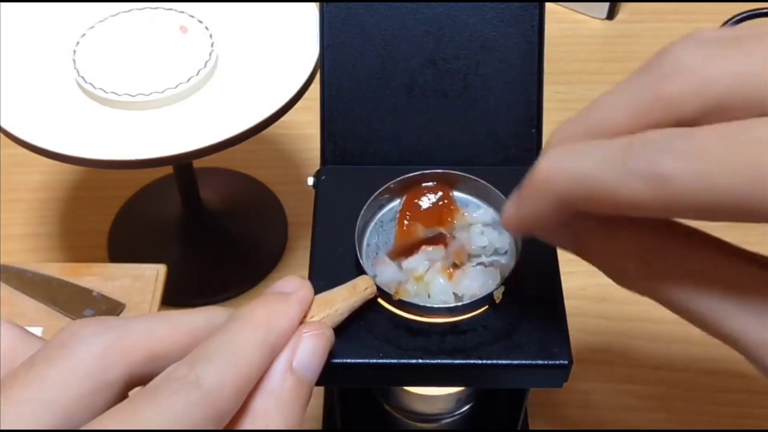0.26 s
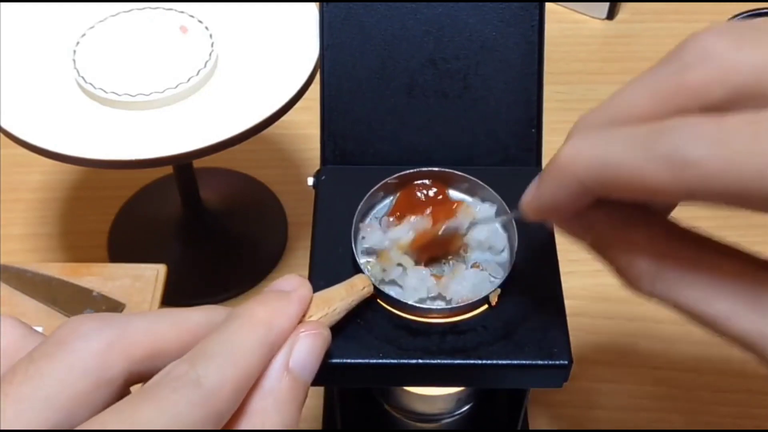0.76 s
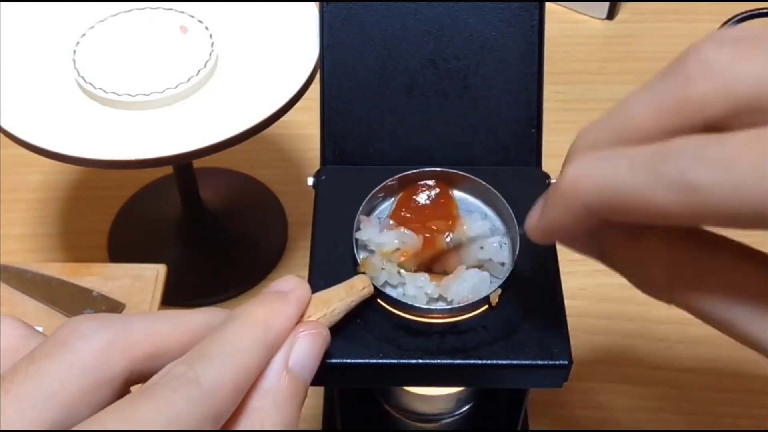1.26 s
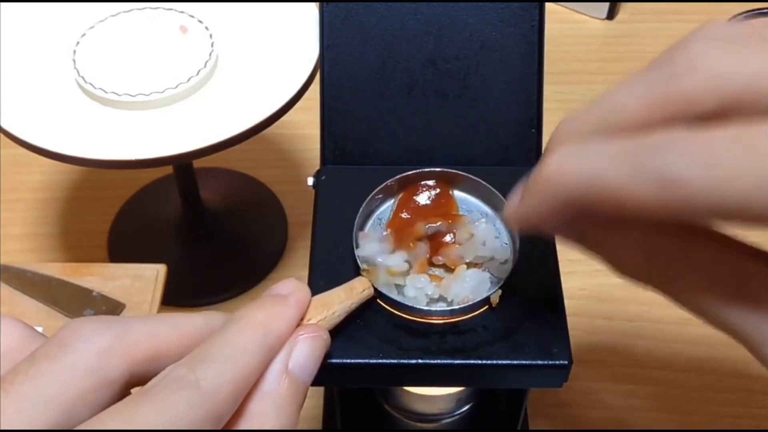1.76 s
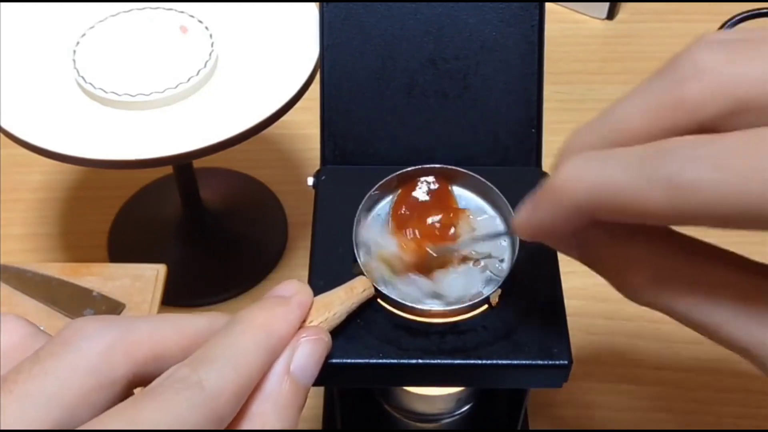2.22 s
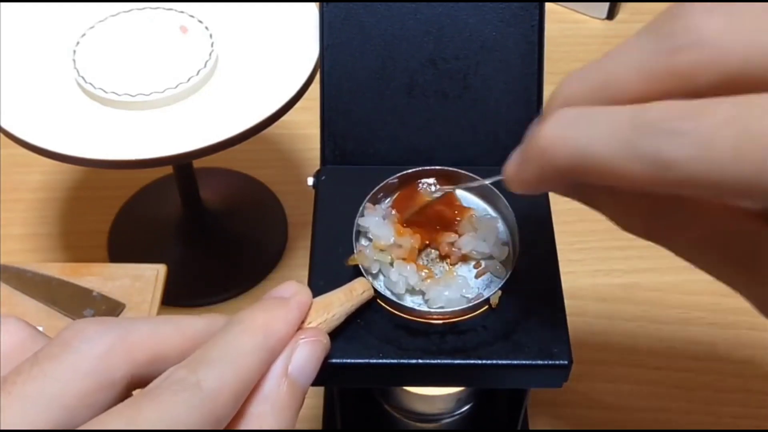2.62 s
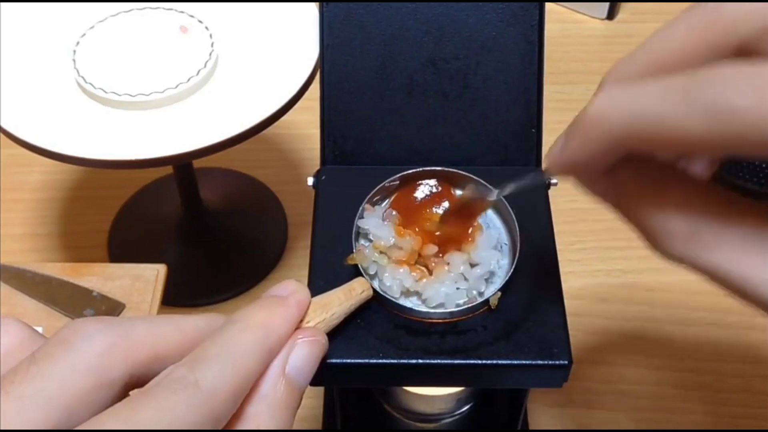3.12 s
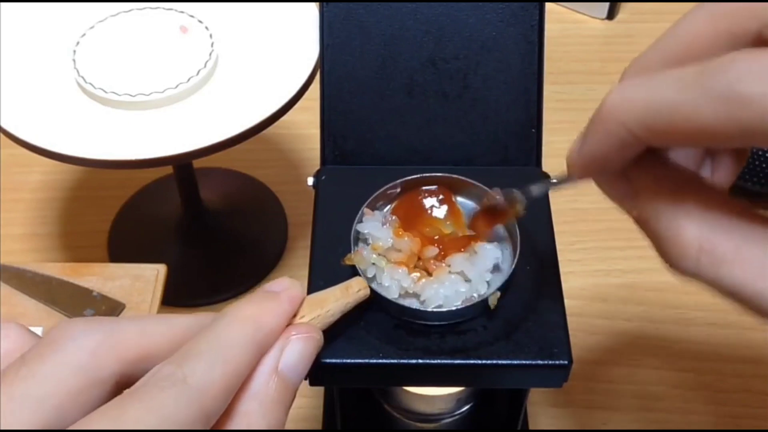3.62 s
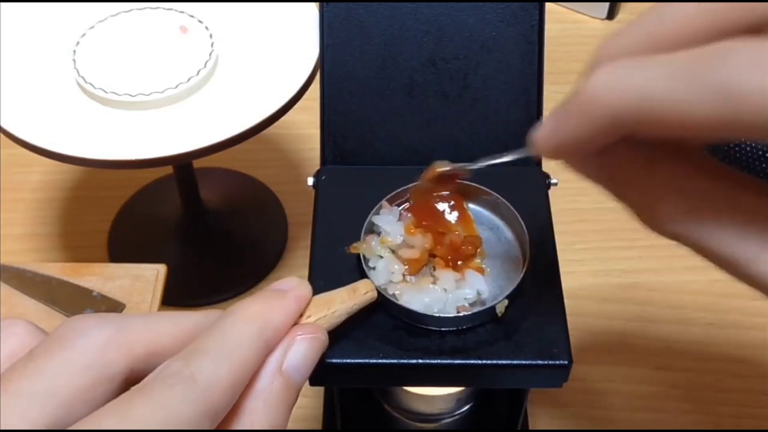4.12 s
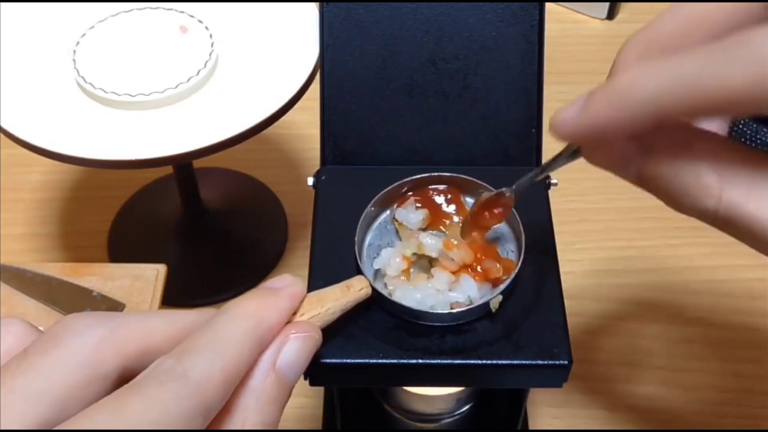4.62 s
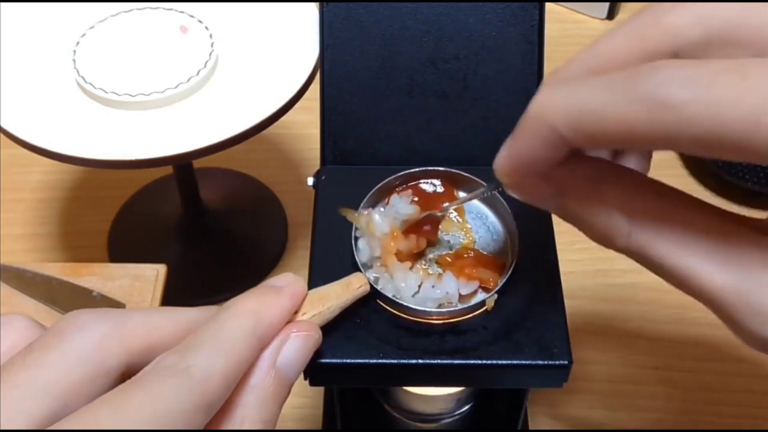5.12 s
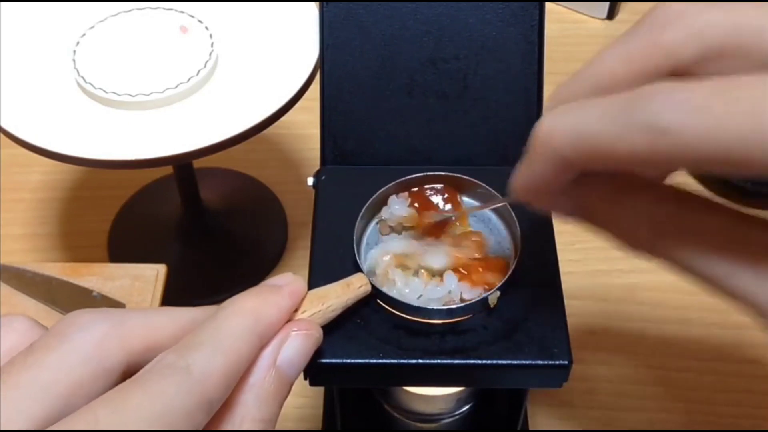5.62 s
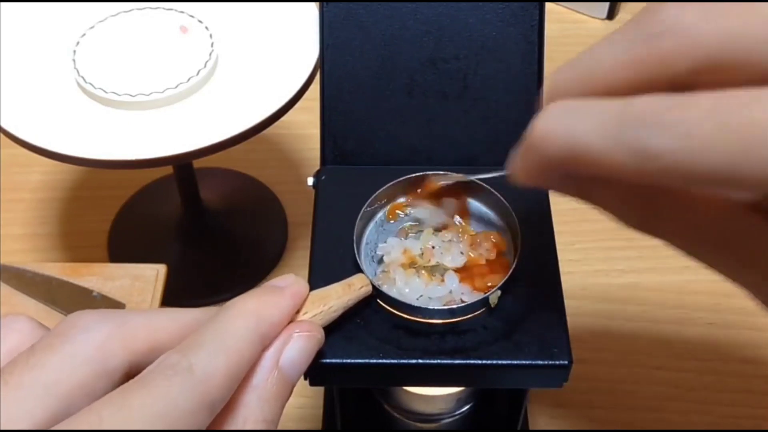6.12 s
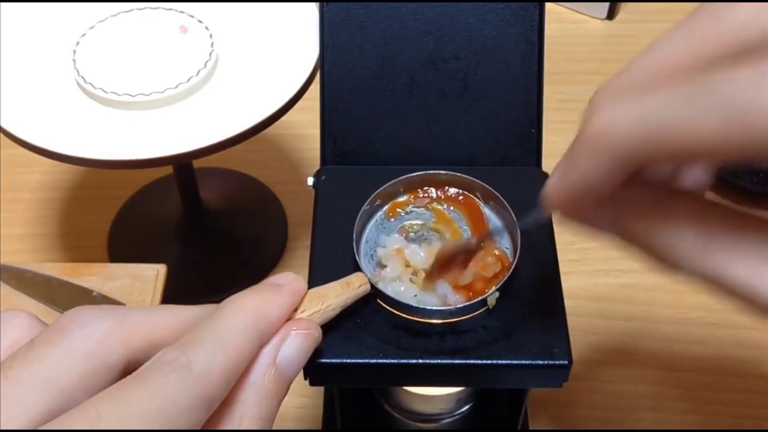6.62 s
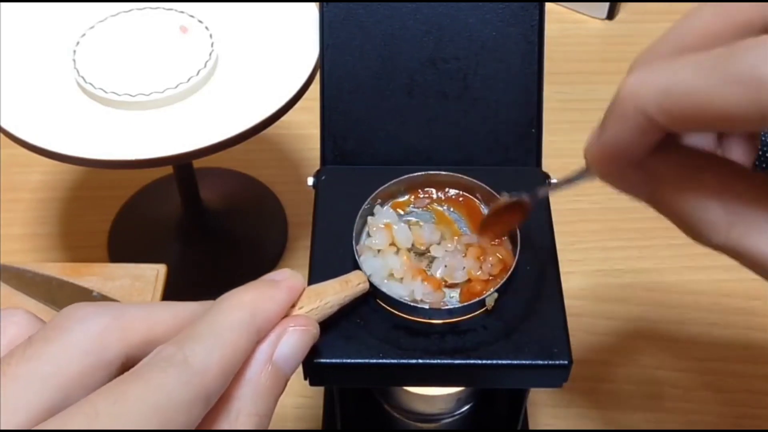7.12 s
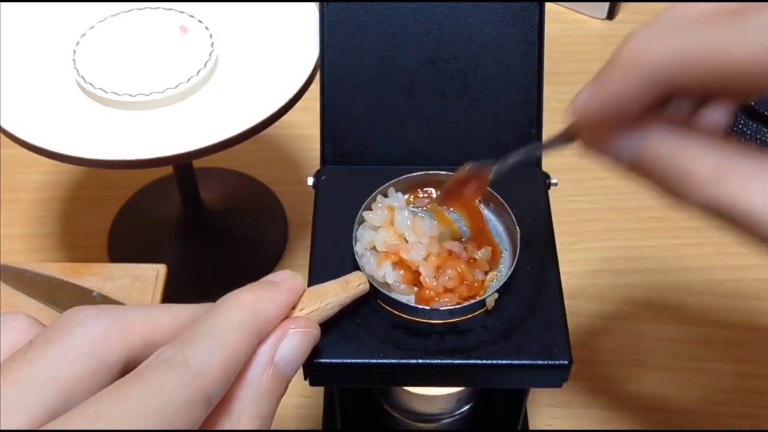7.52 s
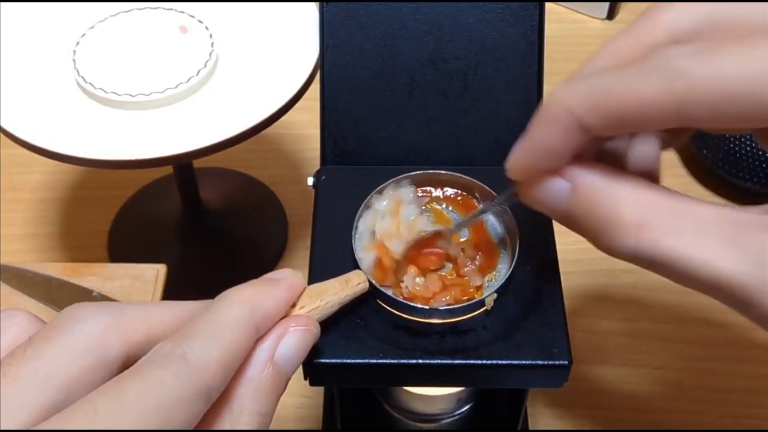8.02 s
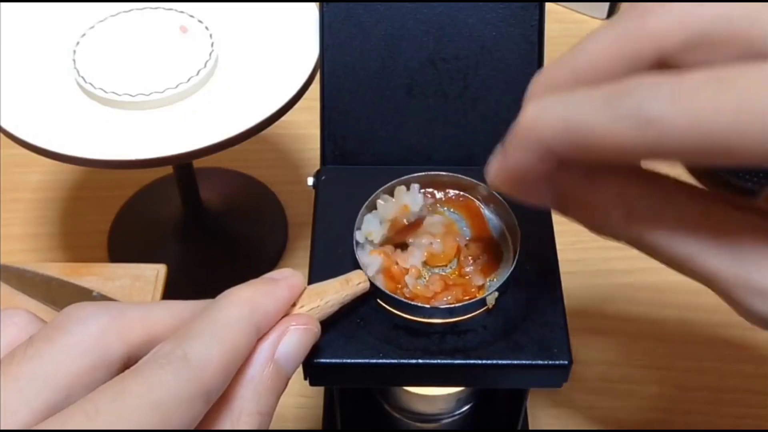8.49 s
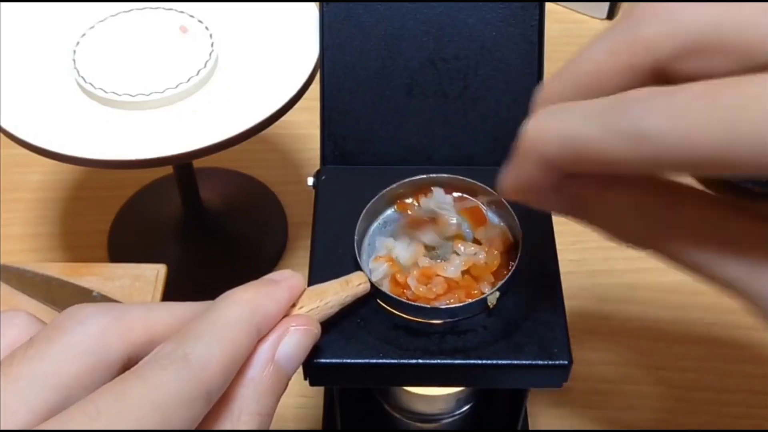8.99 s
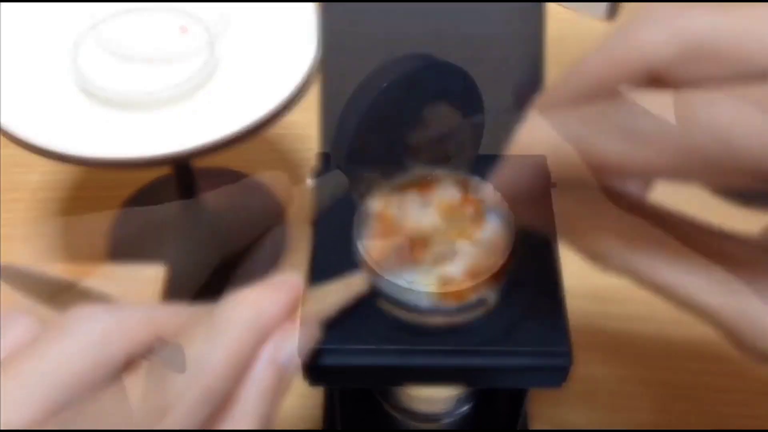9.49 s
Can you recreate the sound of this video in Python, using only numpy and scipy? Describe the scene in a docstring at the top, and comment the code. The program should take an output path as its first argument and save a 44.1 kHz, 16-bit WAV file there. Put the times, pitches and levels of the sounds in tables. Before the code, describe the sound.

Rice and thick sauce are stirred in a tiny hot metal pan, sizzling in bright short bursts with sharp snaps and light spoon clinks.

```python
"""A quiet room: rice and thick sauce are stirred with a small spoon in a tiny hot metal pan on a table-top stove.
Each stroke spreads wet food on the hot metal: clumps of short rings and hiss make a bright sizzle that dies down.
Blisters and the spoon's edge snap or tick: sharp clicks with a dying rattle; sticky food squelches in duller clicks.
The spoon now and then knocks and scrapes, setting the pan ringing. Low noise and a faint hum lie underneath."""
import sys
import numpy as np
from scipy import signal
from scipy.fft import rfft, irfft
from scipy.io import wavfile
from scipy.ndimage import uniform_filter1d

SR = 44100
rng = np.random.default_rng(int(sys.argv[2]) if len(sys.argv) > 2 else 0)


def unload_audio(sound):
    """Save the sound as a 16-bit wav file, at the path given as the first command line argument."""
    columns = np.transpose(np.atleast_2d(sound))
    # keep every value between -1 and 1, then stretch to whole-number steps
    steps = np.round(np.clip(columns, -1, 1) * 32767)
    wavfile.write(sys.argv[1], SR, steps.astype(np.int16))


N = 429975
TIME = np.arange(N) / SR   # seconds
SNAP_T60_S = 0.0065   # time in which the rattle of a sharp snap falls by 60 dB

# tone of the sharp snaps and ticks: (frequency [Hz], relative level [dB])
SNAP_SPECTRUM = [(500, -22), (2000, -22.5), (4000, -10.5), (7000, -7), (10000, 1), (13000, -0.5),
                 (16000, -3)]
# fuller tone of a snap's body, also used for the clack of the spoon: (frequency [Hz], relative level [dB])
BODY_SPECTRUM = [(150, -21.5), (500, -4), (1200, -5.5), (2000, -2), (3500, -6.5), (6000, 0), (12000, -26)]


def from_db(db):
    """Turn decibels into a gain."""
    return 10 ** (np.asarray(db) / 20)


def rms_one(x):
    """Scale to an rms (average strength) of 1."""
    return x / np.sqrt(np.mean(x ** 2) + 1e-20)


def drift(rate):
    """Wander smoothly and at random with an rms of 1, taking `rate` new values a second."""
    return rms_one(np.interp(TIME * rate, np.arange(N), rng.standard_normal(N)))


def colour(x, spectrum, size=2048):
    """Give a sound the tone of a spectrum, with a filter of unit energy that acts as early as it can."""
    hz, db = np.transpose(spectrum)
    grid = np.linspace(1, SR / 2, size // 2 + 1)
    gain = from_db(np.interp(np.log(grid), np.log(hz), db))
    # folding the cepstrum makes the filter minimum-phase: no sound before its cause
    cepstrum = irfft(np.log(gain))
    cepstrum[1:size // 2] *= 2
    cepstrum[size // 2 + 1:] = 0
    response = irfft(np.exp(rfft(cepstrum)))
    return signal.oaconvolve(x, response / np.linalg.norm(response))[:N]


def ring(clicks, hz, t60):
    """Each click sets off a sine that dies by 60 dB in t60 seconds; a click of 1 starts a sine of height 1."""
    r = from_db(-60 / (t60 * SR))
    w = 2 * np.pi * hz / SR
    return signal.lfilter([0, np.sin(w)], [1, -2 * r * np.cos(w), r * r], clicks + 1e-18)


def grains(per_s, spread_db, largest):
    """Clicks at random moments; a spread above 0 dB makes many small and few large."""
    sizes = from_db(spread_db * np.minimum(rng.exponential(1, N), largest))
    sizes = sizes * rng.choice([-1, 1], N)
    return sizes * (rng.random(N) < per_s / SR)


def even(x, seconds):
    """Hold the short-term rms near 1 and keep the finer grain."""
    power = uniform_filter1d(x ** 2, int(seconds * SR))
    return x / np.sqrt(power + np.mean(x ** 2) / 100)


def cracks(times, levels_db, t60, lead, size=2048):
    """Each event is one sharp click trailed by a short, dying rattle, with unit energy at 0 dB."""
    out = np.zeros(N + size)
    for s, db, burst in zip(times, levels_db, rng.standard_normal((len(times), size))):
        burst = burst * from_db(-60 * np.arange(size) / SR / t60)
        burst = burst / np.linalg.norm(burst)
        burst[0] = lead   # the click, against a rattle of energy 1
        at = int(s * SR)
        out[at:at + size] += from_db(db) * burst / np.linalg.norm(burst)
    return out[:N]


def hollow(x):
    """The shallow dish lifts a few bands of what sounds inside it; the lifts shift as food and spoon move about."""
    # hollow of the pan: (frequency [Hz], width [Hz], middle lift [dB])
    bands = [(3530, 320, 5.5), (5350, 270, 2.5), (6970, 370, 0), (8430, 520, 4), (10100, 440, 1),
             (12000, 370, 1.5)]
    out = x
    for hz, width_hz, lift_db in bands:
        lift = from_db(lift_db + 3.3 * drift(12))
        band = signal.lfilter(*signal.iirpeak(hz, hz / width_hz, fs=SR), x)
        out = out + (lift - 1) * band
    return out


def room(x, wet_db):
    """Add the soft, short tail of a furnished room: noise that dies by 60 dB in 0.26 s."""
    t = TIME[:SR // 2]
    tail = rng.standard_normal(len(t)) * from_db(-60 * t / 0.26)
    tail = tail * (t > 0.002)   # the tail starts 2 ms after the direct sound
    return x + from_db(wet_db) * signal.oaconvolve(x, tail / np.linalg.norm(tail))[:N]


def background():
    """Low room noise with a faint hum near 178 Hz; the noise swells a little towards the end."""
    # tone of the room noise: (frequency [Hz], relative level [dB])
    spectrum = [(20, -2.5), (60, -0.5), (100, -2), (135, 2), (180, -1), (250, -3), (500, -10),
                (1000, -14.5), (2500, -21), (8000, -23.5), (16000, -25.5)]
    hum = np.sin(2 * np.pi * np.cumsum(178 + 2 * drift(10)) / SR) * from_db(-73.0 + 2 * drift(8))
    swell_db = np.interp(TIME, [8.6, 9.6], [0, 3.5])
    noise = colour(rng.standard_normal(N), spectrum)
    return hum + from_db(-64 + swell_db) * noise


def stirring_levels():
    """Each stroke rises, swells as the spoon pushes, then boils off: sizzle, squelch and finest-fizz lift in dB."""
    # spoon strokes spreading wet food on the hot metal:
    # (start [s], end [s], time to rise by 20 dB [s], sizzle level mid-stroke [dB], swell over the stroke [dB],
    #  squelch level [dB], lift of the finest fizz [dB])
    strokes = [(0.0, 0.072, .1, -41, 5, -60, 0), (0.245, 0.4, .06, -48.5, -4, -65, 6),
               (0.426, 0.468, 0.055, -41.5, 2.5, -68, 6), (1.008, 1.099, 0.063, -41, 10, -60.5, 0.5),
               (1.407, 1.463, .03, -54, -3, -70, -5), (1.551, 1.648, 0.081, -42.5, 7, -58, 3.5),
               (1.72, 1.74, 0.022, -45, -1, -66, 2), (1.95, 1.978, 0.12, -40.5, -2, -59, 9.5),
               (2.47, 2.5, 0.015, -56.5, 6, -71, -14), (2.632, 2.776, 0.12, -42, 8, -58.5, 2.5),
               (3.432, 3.527, .04, -50, 13.5, -58, 0), (3.559, 3.626, 0.094, -35.5, 1, -56.5, 2),
               (3.755, 3.797, .08, -50.5, 2, -71, -6.5), (3.911, 4.137, 0.053, -54, 5, -67, -14),
               (4.21, 4.457, 0.1, -44.5, -2, -61.5, 3), (4.648, 4.818, 0.091, -37.5, -1.5, -56.5, 6),
               (5.055, 5.075, 0.011, -55, -4, -70.5, -2), (5.47, 5.692, 0.2, -44.5, -2, -60.5, 9.5),
               (5.74, 5.835, .05, -52, -3.5, -70, 6), (5.875, 6.041, 0.024, -45.5, 9, -58, 7.5),
               (6.094, 6.45, 0.12, -46.5, 2, -61.5, 11.5), (6.488, 6.504, 0.074, -37.5, 0.5, -54, 5.5),
               (6.687, 6.843, 0.024, -43, 0, -58.5, 2), (7.022, 7.177, .12, -36, 3, -52.5, 7),
               (7.273, 7.44, 0.11, -48, -8, -59, 1.5), (7.498, 7.602, .03, -55, -8, -68, 5),
               (7.689, 7.812, .07, -41, 4.5, -57, 5), (7.89, 8.107, .08, -50, -7, -62, -0.5),
               (8.221, 8.425, 0.08, -46.5, 5.5, -59.5, 5), (8.738, 8.856, 0.046, -57.5, 17.5, -60.5, 0),
               (8.924, 8.97, .03, -57, -1, -65.5, 3), (9.131, 9.259, 0.025, -47.5, 5.5, -59, 9),
               (9.375, 9.435, 0.057, -59, 1, -65.5, -9)]
    sizzle_fall_db_per_s = 213    # the spread film boils off
    squelch_fall_db_per_s = 108   # the food settles
    # what a stroke leaves simmering, against its own level
    simmer_db, simmer_fall_db_per_s = -20, 22.5
    idle_db = -76   # the pan left alone

    boiling, smacking, fineness = from_db(2 * idle_db), 1e-12, 0
    t = TIME[::40]   # a coarse clock is enough for the levels
    for start, end, attack_s, sizzle_db, swell_db, squelch_db, fine_db in strokes:
        rise_db = -20 * np.maximum(start - t, 0) / attack_s
        since = np.maximum(t - end, 0)
        pushed_db = sizzle_db + rise_db + np.interp(t, [start, end], [-swell_db / 2, swell_db / 2])
        # doubling the decibels turns a gain into a power
        film = from_db(2 * (pushed_db - sizzle_fall_db_per_s * since))
        simmer = from_db(2 * (pushed_db + simmer_db - simmer_fall_db_per_s * since))
        power = film + simmer
        boiling = boiling + power
        fineness = fineness + fine_db * power   # the stronger strokes decide the fineness
        smacking = smacking + from_db(2 * (squelch_db + rise_db - squelch_fall_db_per_s * since))
    levels = (10 * np.log10(boiling), 10 * np.log10(smacking), fineness / boiling)
    return [np.interp(TIME, t, db) for db in levels]


def bubbles(clicks, low_hz, high_hz, t60, count=14):
    """Each click rings briefly at one of `count` bubble pitches, dealt out at random."""
    dealt = rng.integers(0, count, N)
    pitches = np.linspace(low_hz, min(high_hz, SR / 2), count)
    return rms_one(sum(ring(clicks * (dealt == k), hz, t60) for k, hz in enumerate(pitches)))


def sizzle(level_db, fine_db):
    """The wetter the hot metal, the more bubbles burst; they come in clumps over a thin hiss of steam."""
    # tone of the sizzle: (frequency [Hz], relative level [dB])
    spectrum = [(1180, -47), (2000, -15), (2740, -13), (3460, -14), (4340, -9.5), (6200, -5.5),
                (6820, -1.5), (7700, -4.5), (8550, -3), (10500, 0.5), (12100, -2), (14900, -5),
                (16000, -30)]
    per_s = 3500 * from_db(0.75 * (level_db + 41.5) + 4 * drift(220))
    bursts = grains(per_s, spread_db=0.0, largest=6.3) * from_db(1.63 * drift(90))
    rings = bubbles(bursts, low_hz=2320, high_hz=15900, t60=0.00075)
    steam = rng.standard_normal(N)
    fizz = 0.83 * rings + rms_one(bursts) + 0.42 * steam
    fizz = hollow(colour(fizz, spectrum))
    # raise or lower the finest fizz on its own
    finest = signal.sosfilt(signal.butter(1, 11000, "high", fs=SR, output="sos"), fizz)
    fizz = fizz + (from_db(fine_db) - 1) * finest
    sputter_db = 1.7 * drift(35)   # unevenness of the boiling
    return from_db(level_db + sputter_db) * even(fizz, seconds=0.089)


def squelch(level_db):
    """Sticky grains part with duller, sparser smacks."""
    # tone of the smacks: (frequency [Hz], relative level [dB])
    spectrum = [(100, -8), (250, -1.5), (500, 0.5), (800, -0.5), (1200, -2), (1750, 4), (2250, -2.5),
                (2700, -7), (3500, 5), (6000, -14.5)]
    smacks = grains(1300 * from_db(4 * drift(60)), spread_db=4.5, largest=2.24)
    return from_db(level_db) * even(colour(smacks, spectrum), seconds=0.18)


def crackle(level_db):
    """Stray blisters tick out of the sizzle, mostly small; they go on, fewer and fainter, between the strokes."""
    usual_sizzle_db = -42   # at this sizzle level, 42 ticks a second
    per_s = 42 * from_db(0.3 * (level_db - usual_sizzle_db))
    at = np.flatnonzero(rng.random(N) < per_s / SR)
    spread_db = 3.6 * np.minimum(rng.exponential(1, N), 2)[at]
    sizes_db = 0.8 * level_db[at] + 12 + spread_db
    ticks = cracks(at / SR, sizes_db, t60=SNAP_T60_S / 2, lead=0.7)
    return hollow(colour(ticks, SNAP_SPECTRUM))


def snaps():
    """A large blister, or the spoon's edge, snaps in a few milliseconds; each snap has its own amount of body."""
    # sharp snaps of large blisters and of the spoon's edge:
    # (time [s], relative sharp level [dB], relative body level [dB])
    events = [(0.1082, -29, -62), (0.1695, -33, -68), (0.2408, -27, -49.5), (0.2811, -34, -46),
              (0.4286, -27.5, -43.5), (0.9452, -38.5, -56.5), (0.98, -40, -55), (1.0046, -30.5, -44),
              (1.3905, -43, -63), (1.7183, -21, -45), (1.7808, -32, -67), (1.8639, -38.5, -57),
              (1.948, -34.5, -49), (2.2497, -40.5, -61), (2.398, -42, -63), (2.4676, -41, -51),
              (2.4953, -34, -58.5), (2.9114, -41, -65.5), (3.1532, -35.5, -60.5), (3.9422, -31.5, -47),
              (4.0265, -35.5, -57), (4.0765, -24, -41.5), (4.568, -28, -45.5), (5.0475, -34.5, -52),
              (5.321, -36.5, -63), (5.3335, -19.5, -47), (5.523, -29, -52), (5.6518, -31.5, -50),
              (5.695, -35, -55), (5.719, -31.5, -53), (5.875, -27, -53), (6.123, -29, -58),
              (6.3093, -26, -46), (6.8296, -25.5, -39), (7.1378, -26, -41.5), (7.426, -35, -47.5),
              (7.8987, -31, -51), (8.2713, -34, -47), (9.1303, -38, -51)]
    s, sharp_db, body_db = np.transpose(events)
    sharp = colour(cracks(s, sharp_db + 19.5, t60=SNAP_T60_S, lead=0.19), SNAP_SPECTRUM)
    body = colour(cracks(s, body_db + 23.0, t60=SNAP_T60_S * 2, lead=0.17), BODY_SPECTRUM)
    return hollow(sharp) + body


def spoon():
    """Knocks and stick-slip scrapes clack on the food-damped pan, ring it briefly and thud into the stove below."""
    # spoon against the pan: (time [s], relative knock level [dB], relative thud level [dB])
    knocks = [(0.4286, -40, -63), (4.771, -33, -50), (5.3342, -37, -63.5), (6.829, -50, -50.5),
              (6.9764, -37.5, -74), (7.011, -37, -62), (8.746, -38.5, -61), (9.1328, -46.5, -56.5)]
    # spoon dragged over the pan floor: (start [s], end [s], relative level [dB])
    scrapes = [(0.41, 0.474, -62), (4.753, 4.826, -55.5), (6.99, 7.119, -61)]
    # ringing tones of pan and spoon: (frequency [Hz], relative level [dB], time to fall by 60 dB [s])
    pan_tones = [(1505, -5, 0.1), (1748, 9, 0.038), (1936, -7, 0.11), (2101, 3, 0.1), (2270, -28, 0.022),
                 (2800, 4, 0.039), (3310, 10, 0.036), (3460, -9, 0.031), (3700, 1, 0.018),
                 (3850, 10.5, 0.016)]
    # tone of the thud: (frequency [Hz], relative level [dB])
    thud_spectrum = [(50, -37), (100, 3), (220, -2.5), (450, 3), (750, -2.5), (1400, -5), (2500, -11),
                     (6000, -25)]

    pressure = 0
    for start, end, db in scrapes:
        # the spoon presses hardest halfway through a scrape
        through = 2 * (TIME - start) / (end - start) - 1   # -1 at the start, 1 at the end
        pressure = pressure + from_db(db) * np.sqrt(np.maximum(1 - through ** 2, 0))
    slips = pressure * rms_one(grains(900, spread_db=6.0, largest=3.4))

    s, knock_db, thud_db = np.transpose(knocks)
    contact = cracks(s, knock_db + 21.5, t60=0.045, lead=0.7) + from_db(-4) * slips
    metal = 0
    for k, (hz, db, t60) in enumerate(pan_tones):
        # neighbouring tones start in opposite directions
        metal = metal + from_db(db - 34) * ring(contact, hz, t60) * (-1) ** k
    clack = from_db(-1.5) * colour(contact, BODY_SPECTRUM)
    blows = cracks(s, thud_db + 29.0, t60=0.033, lead=0.34)
    thud = colour(blows + from_db(3.0) * slips, thud_spectrum)
    return metal + clack + thud


def scene():
    """The pan in its room; the duller squelch and spoon carry more of the room than the fizz does."""
    room_db = -9   # room tail against the direct sound of the fizz
    sizzle_db, squelch_db, fine_db = stirring_levels()
    food = room(sizzle(sizzle_db, fine_db) + crackle(sizzle_db) + snaps(), room_db)
    stirring = room(squelch(squelch_db) + spoon(), room_db + 3.5)
    return (food + stirring + background())[None]


def record(dry):
    """Cut the top steeply above 15.7 kHz."""
    return signal.sosfilt(signal.ellip(10, 0.2, 80, 15700, fs=SR, output="sos"), dry)


dry = scene()
out = record(dry)
unload_audio(out)
```